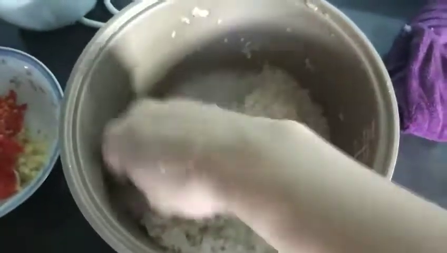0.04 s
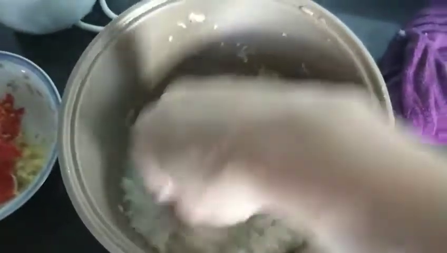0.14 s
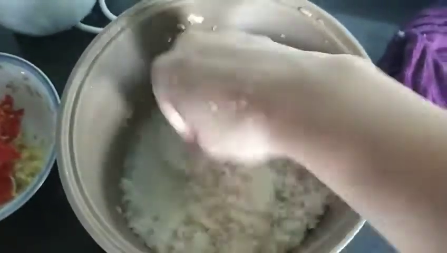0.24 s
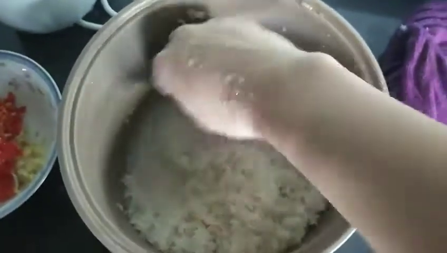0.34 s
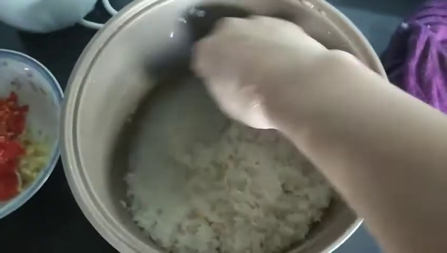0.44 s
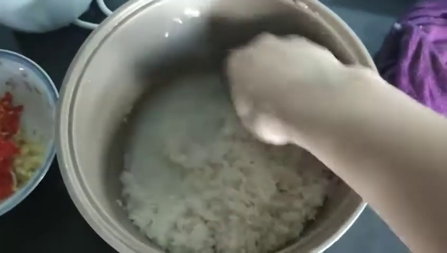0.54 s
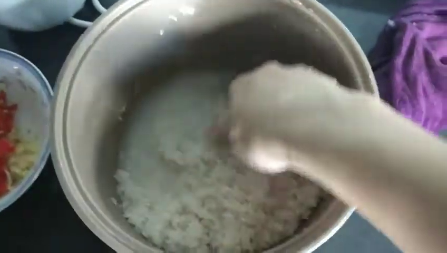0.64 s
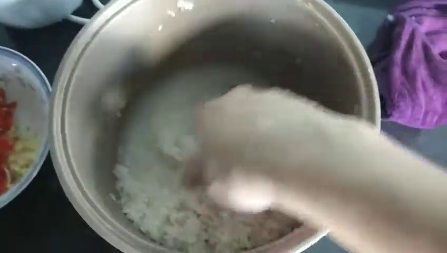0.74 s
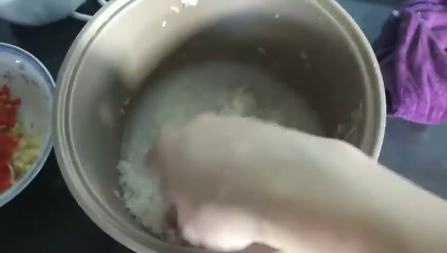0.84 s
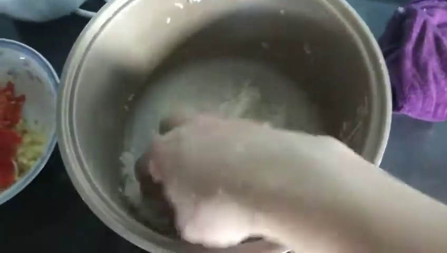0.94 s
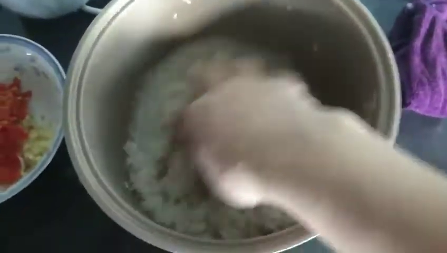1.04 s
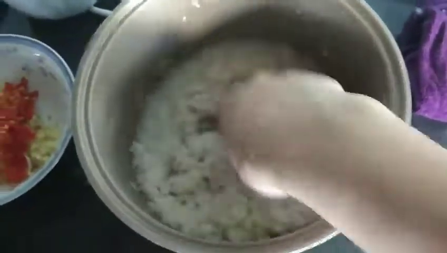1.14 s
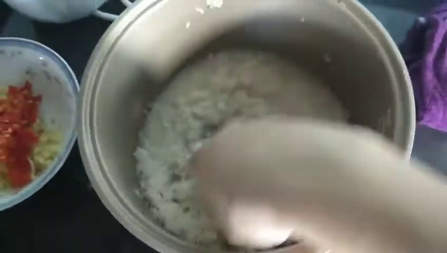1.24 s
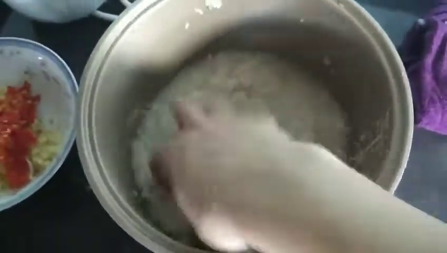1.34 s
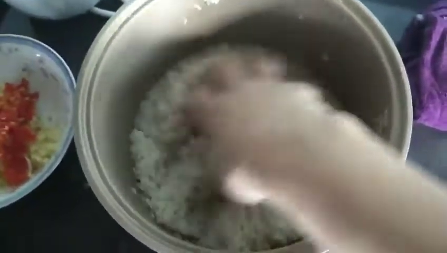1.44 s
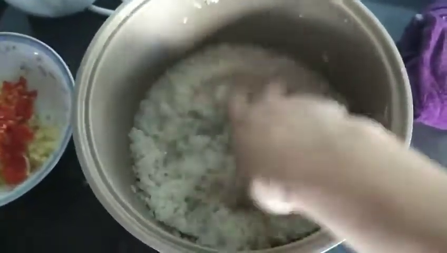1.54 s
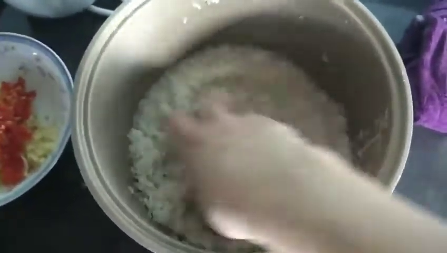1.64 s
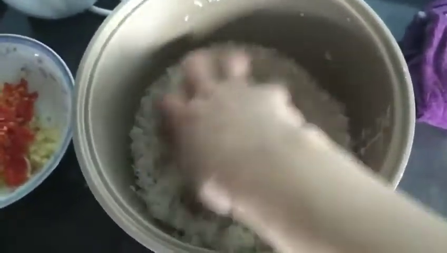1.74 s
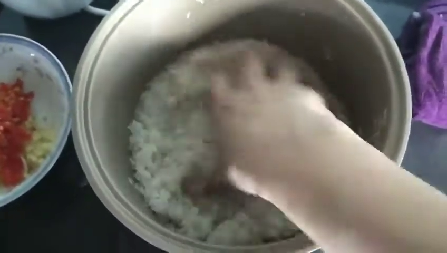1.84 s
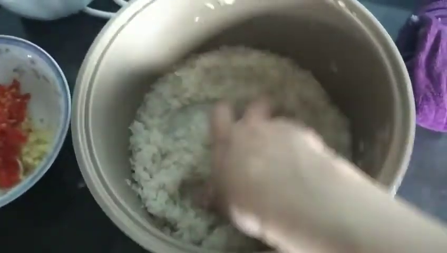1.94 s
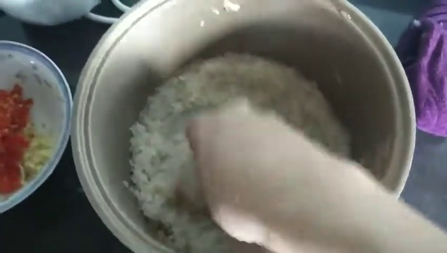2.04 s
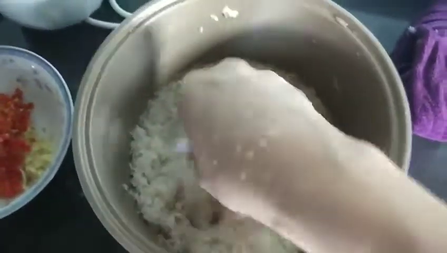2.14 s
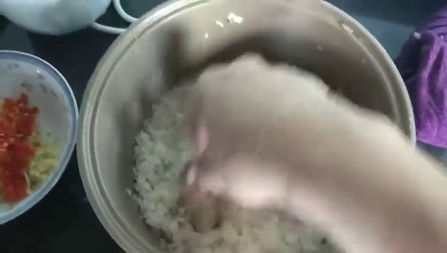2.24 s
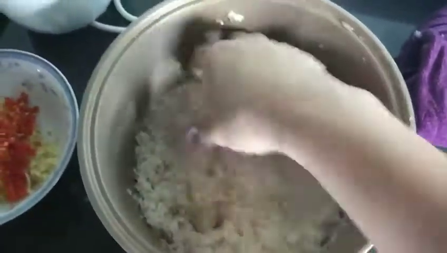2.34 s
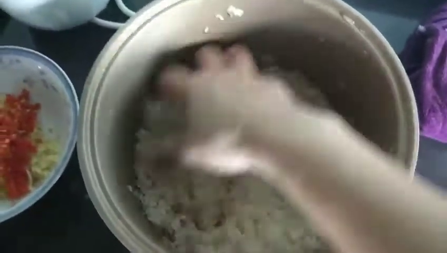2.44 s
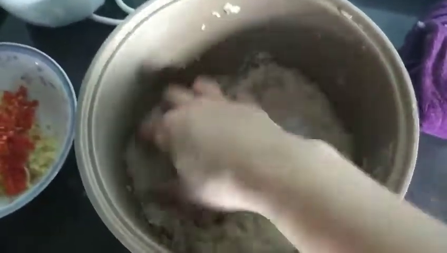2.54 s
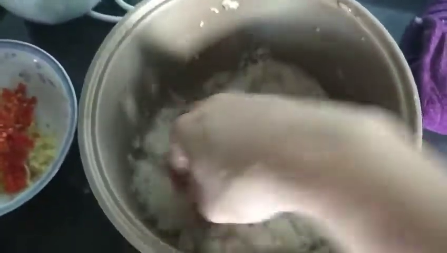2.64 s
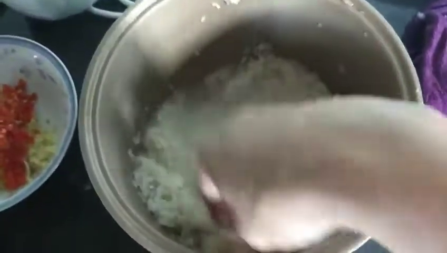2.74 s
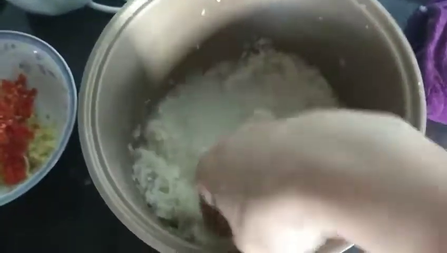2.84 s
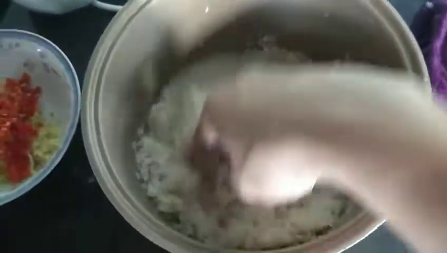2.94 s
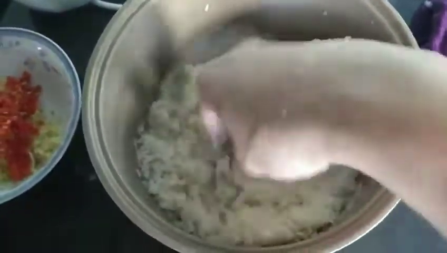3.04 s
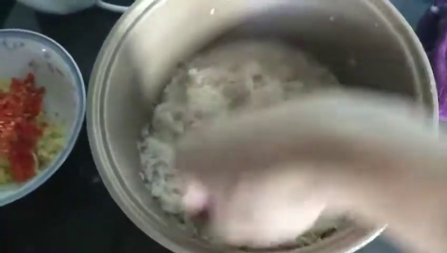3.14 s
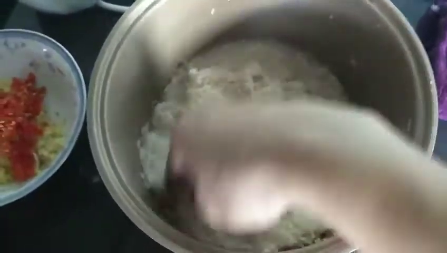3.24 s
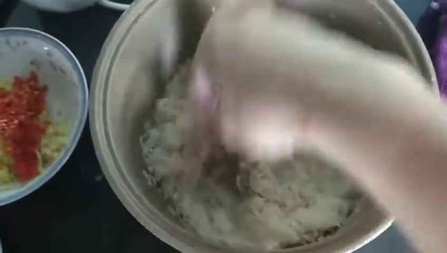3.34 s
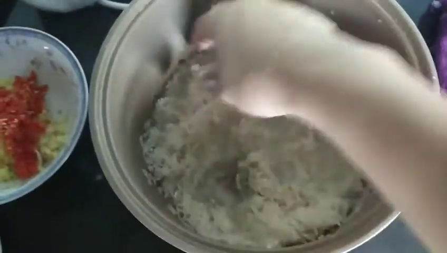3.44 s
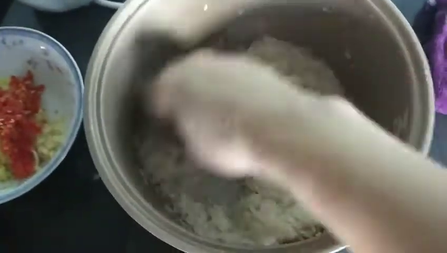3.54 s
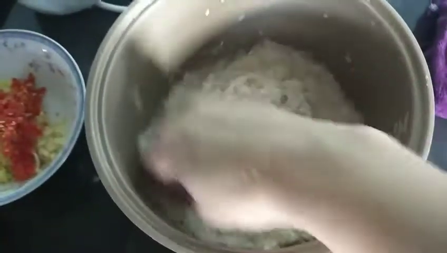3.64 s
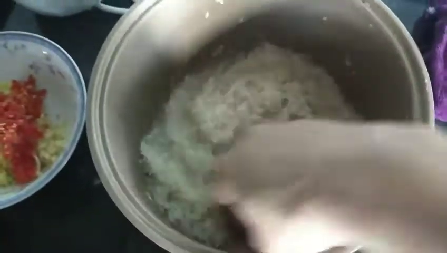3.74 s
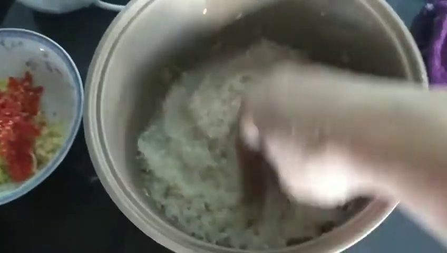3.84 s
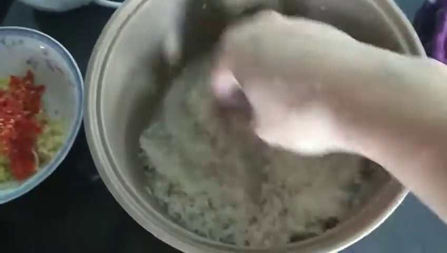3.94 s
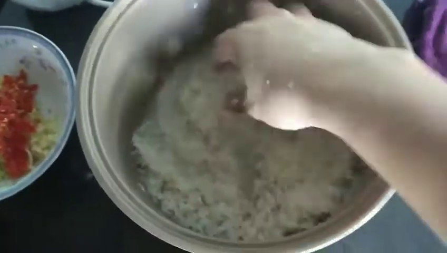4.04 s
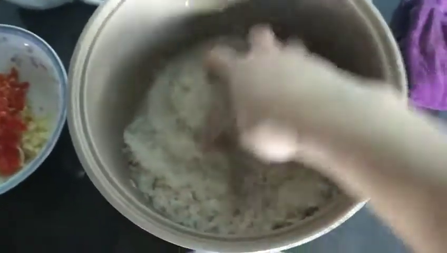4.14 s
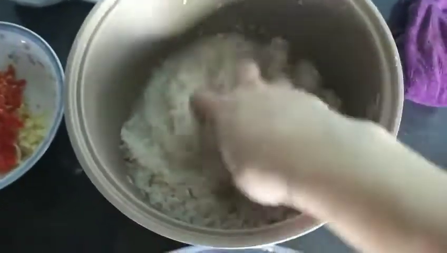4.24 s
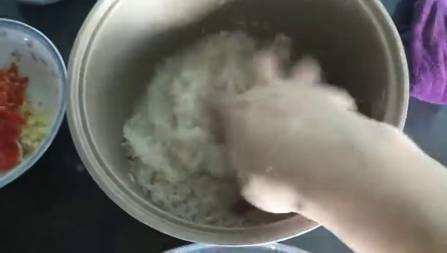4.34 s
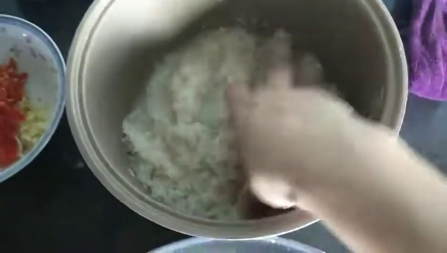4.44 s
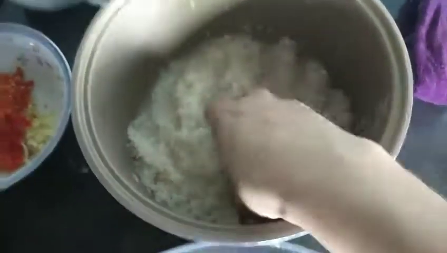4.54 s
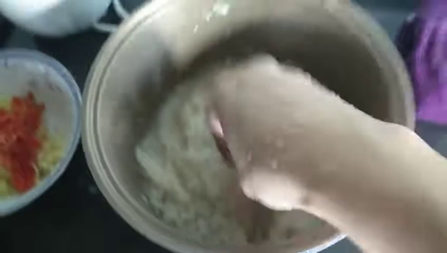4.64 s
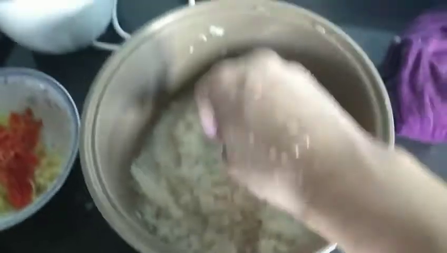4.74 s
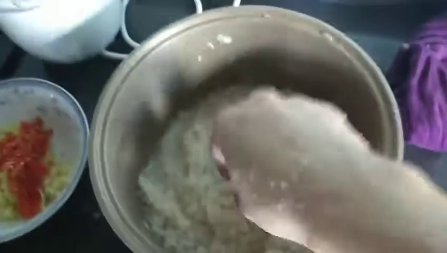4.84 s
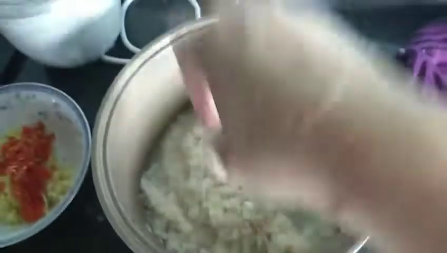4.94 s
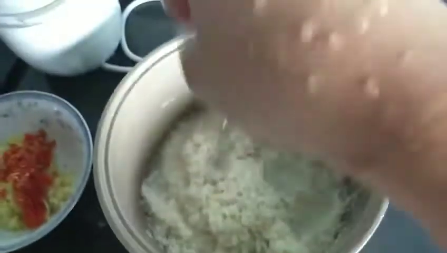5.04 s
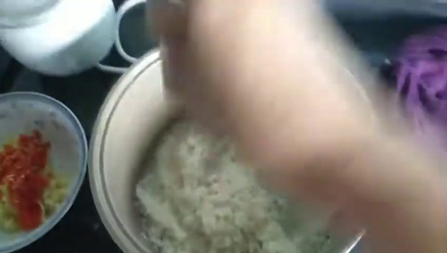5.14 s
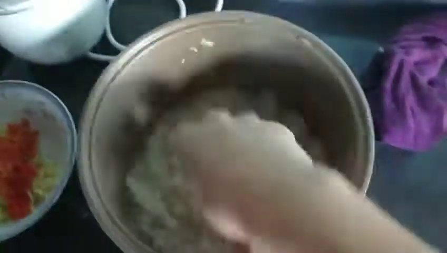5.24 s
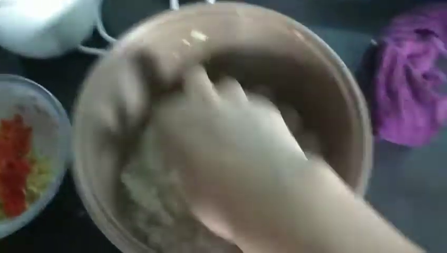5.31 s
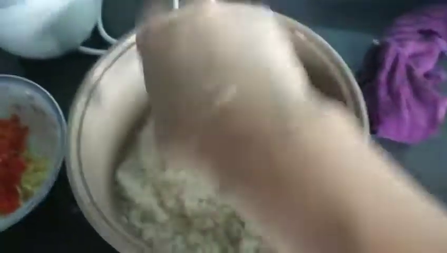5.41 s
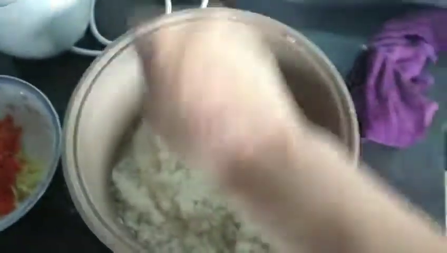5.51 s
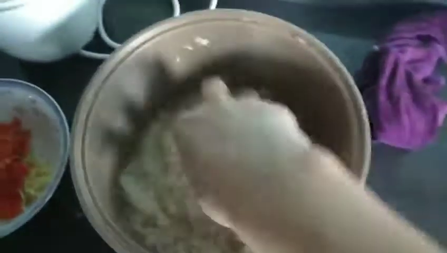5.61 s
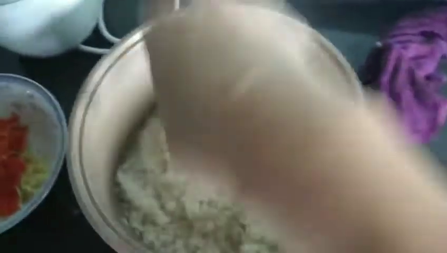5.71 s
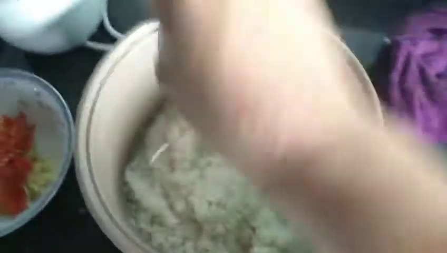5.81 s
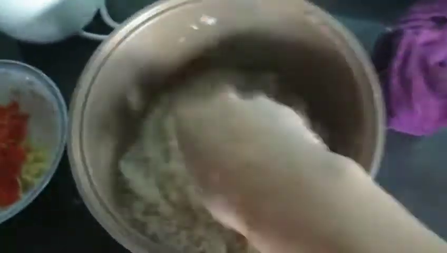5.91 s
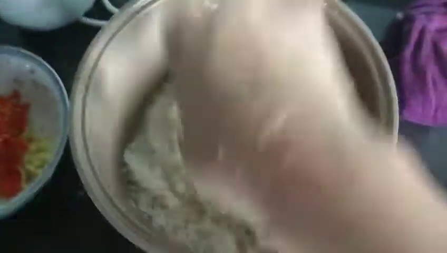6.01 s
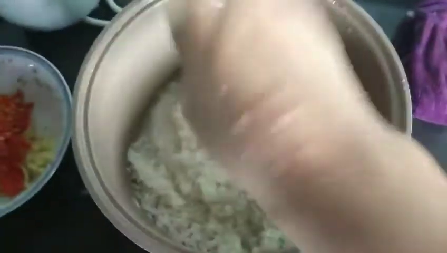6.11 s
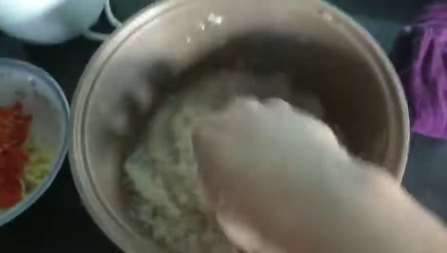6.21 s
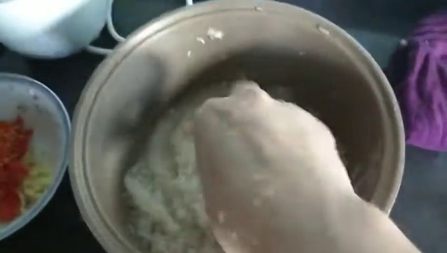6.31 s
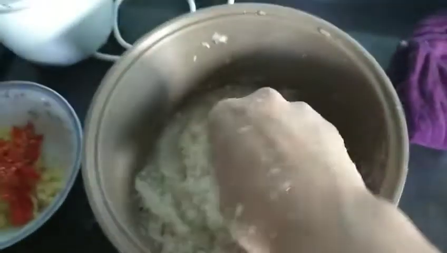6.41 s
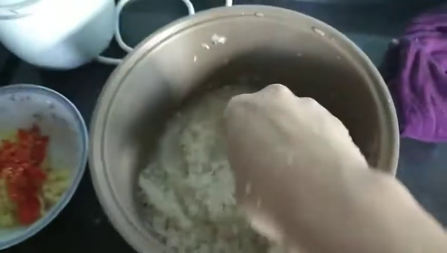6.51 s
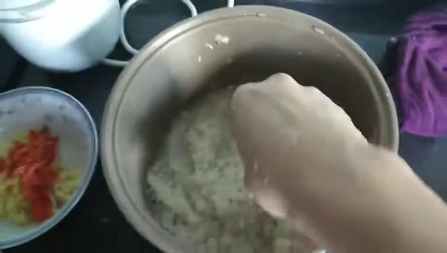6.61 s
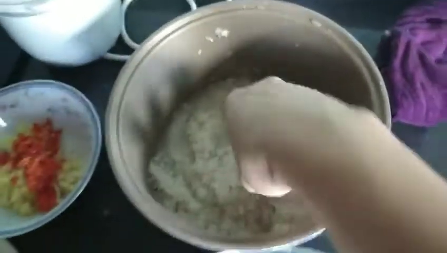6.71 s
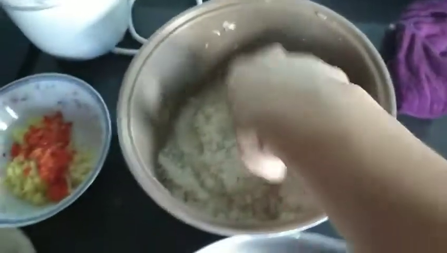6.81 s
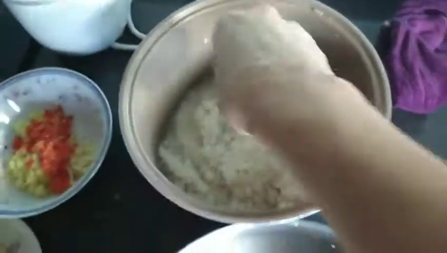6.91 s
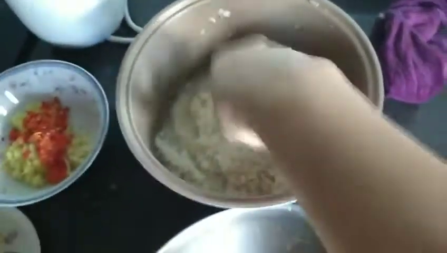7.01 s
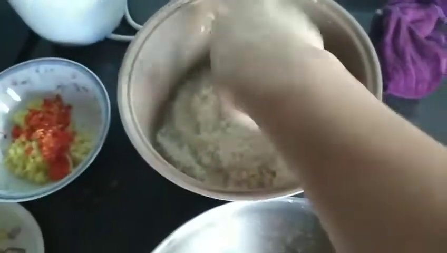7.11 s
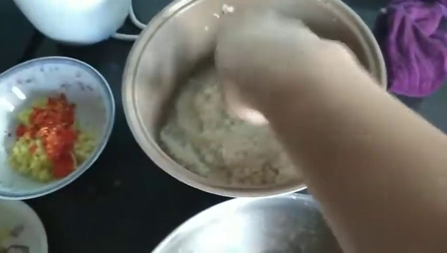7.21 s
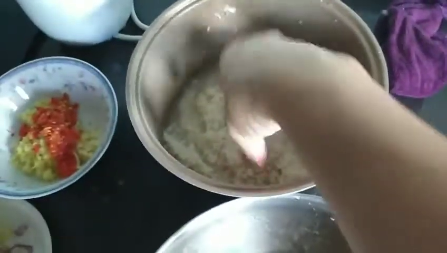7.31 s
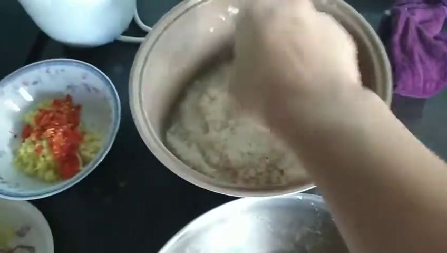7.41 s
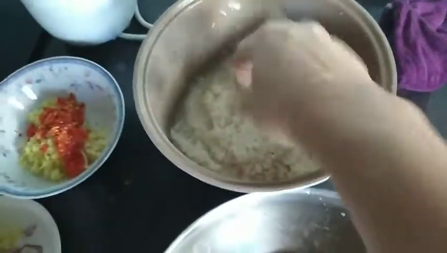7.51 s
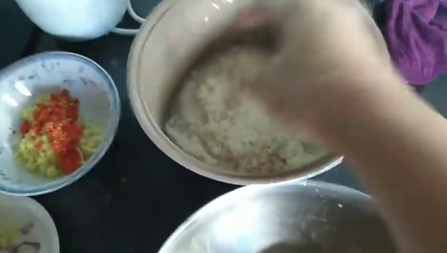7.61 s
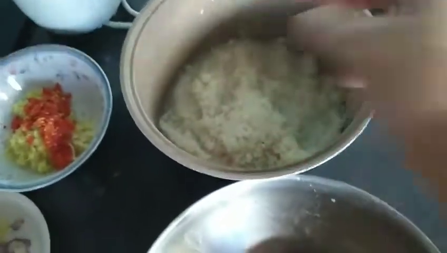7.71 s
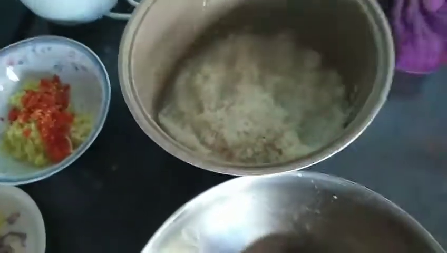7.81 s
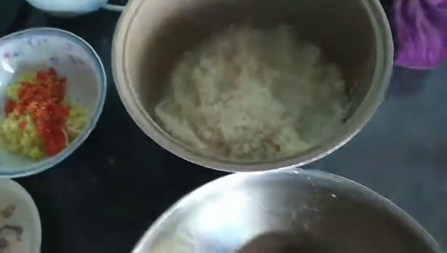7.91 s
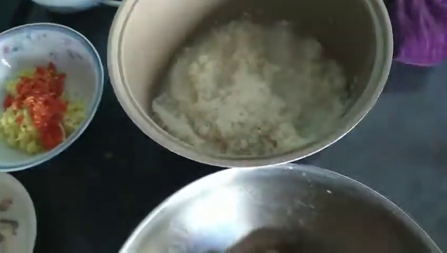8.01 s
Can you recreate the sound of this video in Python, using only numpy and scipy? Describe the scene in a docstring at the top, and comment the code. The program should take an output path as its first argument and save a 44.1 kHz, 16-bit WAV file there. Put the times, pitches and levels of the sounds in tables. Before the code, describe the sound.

Wet grains rub and crackle in irregular swishing strokes, tinted by the ringing of a metal pot. Sharp wet snaps, popping bubbles and air gulping under the palm punctuate the kneading, strongest in the first four seconds. Then come a few drops, one last moderate rub, sparse tiny ticks and near quiet. The microphone is close, in stereo, with slight kitchen reverberation.

```python
"""Wet rice rubs and crackles as a hand stirs and kneads it in a metal pot, close by, in a quiet kitchen.
Rub and crackle are dense random contacts, coloured by the pot's resonances and driven by a list of strokes.
Wet films tear with squelches, trapped air gulps out under the palm, bubbles ring, drops and films tick.
Late on, grains picked off the fingers tick at random, and one faint gliding chirp is heard.
Steady filtered noise is the room; decaying noise tails are the pot wall and the kitchen."""
import sys
import numpy as np
from scipy import signal
from scipy.fft import rfft, irfft
from scipy.io import wavfile
from scipy.ndimage import map_coordinates

SR = 44100
rng = np.random.default_rng(int(sys.argv[2]) if len(sys.argv) > 2 else 0)


def transcribe(signal):
    """Save signal, clipped to [-1, 1], as a 16-bit WAV file at the path in sys.argv[1]."""
    frames = np.atleast_2d(signal).T
    limited = np.clip(frames, -1, 1)
    pcm = np.round(limited * 32767).astype(np.int16)
    wavfile.write(sys.argv[1], SR, pcm)


N = 355446
TIME = np.arange(N) / SR
POT_T60_S = 0.09

# wet films tearing between fingers and rice: start_s, level_db, length_s
FILM_TEARS = [(0.082, -33, 0.0088), (0.351, -38, 0.023), (.497, -24.5, 0.0065), (0.565, -34.5, 0.0085),
              (0.692, -37, 0.032), (1.297, -26.5, .005), (1.675, -29, 0.023), (2.501, -27, 0.021),
              (2.595, -38, .007), (2.959, -22.5, 0.014), (3.267, -48, 0.0072), (3.304, -32.5, .01),
              (3.316, -25, 0.0096), (3.605, -16.5, 0.0075), (4.232, -21.5, 0.03), (4.586, -31, .004),
              (5.331, -33, 0.0071), (5.432, -32.5, 0.033), (5.553, -32, 0.0044), (5.737, -46, 0.0037),
              (5.794, -41, 0.014), (5.916, -46, 0.0044), (6.086, -36.5, 0.0089), (6.14, -43.5, 0.0074),
              (6.22, -53, .006), (6.404, -46.5, 0.0036), (6.889, -53, 0.014), (7.195, -51, 0.011),
              (7.439, -54, .006)]
# air pockets forced out under the palm: start_s, level_db, length_s, spray_over_gulp_db, tilt_db_per_octave
AIR_POCKETS = [(2.11, -15.5, 0.0061, 3.5, -0.8), (2.688, -23.5, 0.014, 2, -2), (3.764, -36, 0.04, 3, -1.5),
               (4.669, -34.5, .017, -22, -3)]
# resonances of the pot and the air in it: centre_hz, width_hz, lift_db
POT_RESONANCES = [(623, 61, 8), (698, 66, 4.5), (1134, 16, -1.5), (1162, 84, 9.5), (1790, 29, 8.5),
                  (1402, 59, 6.5), (1450, 31, -5.5), (2294, 37, 7), (2460, 100, 5), (2860, 25, 8),
                  (3176, 170, 3.5), (3546, 45, 1.5), (3840, 27, 5.5), (4580, 240, 6), (6590, 20, -4),
                  (7550, 98, 2.5), (7445, 100, 6.5), (8200, 50, 4.5), (8910, 53, -11.5)]
# colour of rubbing grains before the pot shapes it: freq_hz, level_db_per_hz
RUB_COLOUR = [(100, -49.5), (600, -36.5), (1200, -12.5), (1900, -1.5), (2900, 6), (4500, 7.5),
              (5200, -14.5), (8000, -37)]


def from_db(db):
    """Decibels to amplitude gain."""
    return 10 ** (np.asarray(db) / 20)


def rms_one(x):
    """Scale to unit power."""
    return x / np.sqrt(np.mean(x ** 2) + 1e-20)


def in_time(rows):
    """Each column of a curve at every sample."""
    s, *columns = np.transpose(rows)
    return [np.interp(TIME, s, c) for c in columns]


def at_hz(points, hz):
    """Read a spectrum on a log-frequency axis."""
    knots_hz, values = np.transpose(points)
    return np.interp(np.log(hz + 1), np.log(knots_hz), values)


def balance_db(hz):
    """Left and right level: half the difference goes to each channel."""
    # balance of the two channels: freq_hz, left_minus_right_db
    channel_difference = [(40, -2), (110, 16.5), (330, 12.5), (480, 3), (640, -1), (900, 1), (1200, 4.5),
                          (2500, 4), (4500, 2.5), (5500, 3), (7400, -1), (9000, 10), (11000, 9.5),
                          (14000, 5.5)]
    return at_hz(channel_difference, hz) * np.array([[.5], [-.5]])


def drift(rate_hz):
    """Random piecewise-linear curve of unit power, with rate_hz new values a second."""
    steps = rng.standard_normal(N // 20)
    return rms_one(np.interp(TIME * rate_hz, np.arange(len(steps)), steps))


def colour(x, spectrum, modes=(), size=4096):
    """Minimum-phase filter of unit power: a spectrum lifted or cut at the modes, balanced per channel."""
    hz = np.arange(size // 2 + 1) * SR / size
    db = at_hz(spectrum, hz) + balance_db(hz)
    for centre_hz, width_hz, lift_db in modes:
        db = db + lift_db / (1 + (2 * (hz - centre_hz) / width_hz) ** 2)
    # folding the cepstrum makes the filter causal
    cepstrum = irfft(np.log(from_db(db)))
    cepstrum[:, 1:size // 2] *= 2
    cepstrum[:, size // 2 + 1:] = 0
    response = rms_one(irfft(np.exp(rfft(cepstrum)))) / np.sqrt(size)
    return signal.oaconvolve(np.atleast_2d(x), response, axes=1)[:, :N]


def echoes(x, t60_s, low_hz):
    """Dense reflections: a decaying noise tail, different per channel, unit power before its low cut."""
    t = TIME[:SR // 2]
    tail = rng.standard_normal((2, len(t))) * from_db(-60 * t / t60_s) * (t > .0006)
    low_cut = signal.butter(2, low_hz, "high", fs=SR, output="sos")
    tail = signal.sosfilt(low_cut, rms_one(tail)) / np.sqrt(len(t))
    return signal.oaconvolve(x, tail, axes=1)[:, :N]


def off_walls(clicks, wet_db, t60_s):
    """Contacts bounce round the pot: noise, separate per channel, follows their decaying power."""
    keep = from_db(-60 / (t60_s * SR)) ** 2
    power = signal.lfilter([1 - keep], [1, -keep], clicks[0] ** 2 + 1e-18)
    return clicks + from_db(wet_db) * np.sqrt(power) * rng.standard_normal((2, N))


def grains(per_s, spread_db, right_lead_s=.00009, scatter_s=.00004):
    """Tiny contacts of uneven strength at random moments, each with its own lag between the channels."""
    chance = np.clip(per_s / SR, 1e-4, 1)
    strength = from_db(spread_db * np.minimum(rng.exponential(1, N), 4))
    sizes = strength * rng.choice([-1, 1], N)
    left = rms_one(sizes * (rng.random(N) < chance) / np.sqrt(chance))
    lead = np.round(SR * (right_lead_s + scatter_s * rng.standard_normal(N)))
    right_index = np.clip(np.arange(N) - lead, 0, N - 1).astype(int)
    return np.array([left, np.bincount(right_index, left, N)])


def bursts(rows, rise_s, t60_s):
    """Envelope of events (start_s, level_db, length_s) that swell, hold and die; powers add."""
    power = np.zeros(N)
    for s, db, length_s in rows:
        start = int(s * SR)
        t = TIME[:min(SR // 3, N - start)]
        decay = from_db(db - 60 * np.maximum(t - length_s, 0) / t60_s)
        power[start:start + len(t)] += (decay * (1 - np.exp(-t / rise_s))) ** 2
    return np.sqrt(power)


def clicks_at(s, db):
    """Single clicks, alike in both channels."""
    clicks = np.zeros((2, N))
    clicks[:, (s * SR).astype(int)] = from_db(db)
    return clicks


def background(alike_below_hz=900, level_db=-54.5):
    """Steady room noise, alike in both channels in the bass and diffuse above."""
    # the kitchen's background: freq_hz, level_db_per_hz
    room_colour = [(25, -21), (50, -17), (80, -2.5), (110, -2), (175, 4), (290, -6), (480, -3), (740, 0),
                   (950, -6), (2000, -8), (4600, -14.5), (5100, -22.5), (8300, -16.5), (14000, -58.5)]
    low = signal.butter(1, alike_below_hz, fs=SR, output="sos")
    high = signal.butter(1, alike_below_hz, "high", fs=SR, output="sos")
    shared = signal.sosfilt(low, rng.standard_normal(N))
    diffuse = signal.sosfilt(high, rng.standard_normal((2, N)))
    return from_db(level_db) * colour(shared + diffuse, room_colour)


def chirp(level_db=-56.5, fade_s=0.013, break_s=6.552):
    """A thin, unsteady gliding whistle that breaks at its top, perhaps a bird outside."""
    # two slurs: time_s, pitch_hz
    glide = [(6.505, 4230), (6.536, 4700), (6.552, 4850), (6.572, 4770), (6.605, 4620), (6.65, 4580)]
    hz, = in_time(glide)
    edge_s = np.min([TIME - glide[0][0], glide[-1][0] - TIME, abs(TIME - break_s)], axis=0)
    fade = np.clip(edge_s / fade_s, 0, 1) ** 2
    phase = 2 * np.pi * np.cumsum(hz + 40 * drift(250)) / SR
    return from_db(level_db + 2.9 * drift(120)) * fade * np.sin(phase)


def bubbles(rise_per_s=1.0):
    """Small bubbles and drips: decaying sines that rise a little in pitch."""
    # start_s, pitch_hz, level_db, t60_s
    bubble_rings = [(2.522, 332, -44, .09), (3.262, 1570, -38, .035), (3.607, 340, -46, 0.085),
                    (3.608, 5640, -15, 0.033), (4.092, 7200, -24, 0.027), (4.244, 348, -50.5, 0.19),
                    (5.104, 1640, -44.5, 0.076), (7.325, 1870, -47.5, 0.056), (7.328, 2200, -51, 0.058)]
    out = np.zeros((2, N))
    t = TIME[:SR // 5]
    for s, hz, db, t60_s in bubble_rings:
        start = int(s * SR)
        tone = np.sin(2 * np.pi * hz * t * (1 + rise_per_s * t / 2))
        ring = tone * from_db(db - 60 * t / t60_s) * (1 - np.exp(-t / 0.00092))
        out[:, start:start + len(t)] += ring * from_db(balance_db(hz))
    return out


def hollow(rise_s=0.0067):
    """Every gulp leaves the pot and the air in it ringing in a few decaying modes."""
    # freq_hz, level_against_gulp_db, t60_s
    hollow_modes = [(180.3, -27.5, 0.39), (582.5, -8.5, 0.29), (638, -11, 0.19), (777, -13.5, 0.18)]
    out, t = np.zeros((2, N)), TIME[:SR // 2]
    for s, db, *_ in AIR_POCKETS:
        start = int(s * SR)
        for hz, mode_db, t60_s in hollow_modes:
            decay = from_db(db + mode_db - 60 * t / t60_s)
            ring = np.sin(2 * np.pi * hz * t) * decay * (1 - np.exp(-t / rise_s))
            out[:, start:start + len(t)] += ring * from_db(balance_db(hz))
    return out


def gulps():
    """Escaping air sputters, water slaps back into the pocket, and a fine spray follows each a moment later."""
    # colours before the pot shapes them: freq_hz, level_db_per_hz
    gulp_colour = [(30, -37), (90, -39), (175, -18), (260, -19), (370, -8), (480, -12), (610, -6),
                   (830, -7), (1120, 2.5), (1600, 0.5), (2400, 5.5), (3600, 3.5), (4500, -5.5), (5200, -28),
                   (9000, -41.5)]
    spray_colour = [(300, -37), (4000, -26.5), (5300, -32), (6400, -14), (7500, -9.5), (8800, -13),
                    (10000, -31.5), (14000, -39)]
    refill_delay_s, refill_db, refill_s = 0.019, -8, .016
    spray_delay_s = 0.0033
    sputter = grains(8000, spread_db=1.0, right_lead_s=-.00008)
    droplets = grains(12000, spread_db=.5)
    out, spray = 0, []
    for s, db, length_s, spray_db, tilt_db in AIR_POCKETS:
        surges = [(s, db, length_s), (s + refill_delay_s, db + refill_db, refill_s)]
        envelope = bursts(surges, rise_s=0.00091, t60_s=0.018)
        air = off_walls(envelope * sputter, wet_db=-2, t60_s=0.22)
        tilted = [(hz, level + tilt_db * np.log2(hz / 1800)) for hz, level in gulp_colour]
        out = out + colour(air, tilted, POT_RESONANCES)
        spray += [(start + spray_delay_s, level + spray_db, hold) for start, level, hold in surges]
    mist = bursts(spray, rise_s=0.0013, t60_s=.025) * droplets
    return out + colour(off_walls(mist, wet_db=-4, t60_s=0.11), spray_colour, POT_RESONANCES)


def ticks():
    """Tearing films fling drops at the wall, falling drops splash and knock on the rice, picked grains tick."""
    # drops falling from the hand onto the rice: start_s, level_db
    falling_drops = [(.355, -18), (4.59, -8.5), (5.258, -21), (5.741, -14), (7.4403, -32)]
    # colour before the pot shapes it: freq_hz, level_db_per_hz
    tick_colour = [(100, -48), (1200, -24.5), (2900, 1.5), (5000, -0.5), (6500, -0.5), (8800, 12),
                   (11000, 3.5), (14200, 3)]
    flick_db, flick_db_per_tear_db, flick_delay_s = -2, 0.61, 0.0012
    flick_loss_db_per_s = 201.5  # slow tears flick less
    thud_db = -7.5  # the grains' knock against the splash
    pick_from_s, pick_to_s, picks_per_s = 5.5, 7.3, 6
    pick_db, pick_spread_db = -36, 4.5

    s, db, length_s = np.transpose(FILM_TEARS)
    flick_levels_db = flick_db + flick_db_per_tear_db * db - flick_loss_db_per_s * length_s
    flicks = clicks_at(s + flick_delay_s, flick_levels_db)
    drops = clicks_at(*np.transpose(falling_drops))
    picking = (TIME > pick_from_s) * (TIME < pick_to_s)
    picked = (rng.random(N) < picks_per_s / SR) * picking
    picks = picked * from_db(pick_db + pick_spread_db * rng.uniform(-1, 1, N))
    knocks = off_walls(from_db(thud_db) * drops, wet_db=2, t60_s=0.026)
    thuds = colour(knocks, RUB_COLOUR, POT_RESONANCES)
    sharp = off_walls(flicks + drops + picks, wet_db=5, t60_s=0.023)
    return thuds + colour(sharp, tick_colour, POT_RESONANCES)


def squelches():
    """A wet film tears in a quick, bright run of bursting micro-bubbles."""
    # colour before the pot shapes it: freq_hz, level_db_per_hz
    squelch_colour = [(50, -55.5), (300, -21), (1200, -25.5), (2500, -16.5), (4400, -8), (5100, -13),
                      (5800, -2), (7500, 0.5), (8800, 8), (10200, -1.5), (14200, -7.5)]
    tearing = bursts(FILM_TEARS, rise_s=0.00046, t60_s=0.02) * grains(9000, spread_db=-1.0)
    return colour(off_walls(tearing, wet_db=-1.5, t60_s=POT_T60_S), squelch_colour, POT_RESONANCES)


def strokes():
    """Crackle, rub and press levels in dB: each stroke swells and eases off; overlapping powers add."""
    # strokes of the hand: fastest_s, swell_s, ease_s, effort_db, wetness_db, bottom_pressure_db
    hand_strokes = [(.14, 0.084, 0.057, -44.5, 11.5, -21), (.24, 0.14, 0.12, -41.5, 3, -23),
                    (0.601, .055, 0.27, -43.5, 5, -7.5), (.88, 0.093, 0.17, -41, 2, -12.5),
                    (1.03, 0.065, 0.61, -37.5, -1, -8.5), (1.37, 0.2, 0.15, -37, 9, -33),
                    (1.48, 0.072, .2, -37, 4.5, -4), (1.64, 0.071, 0.17, -35, 4, -20),
                    (1.79, 0.025, 0.22, -34, 3.5, -9.5), (2.08, 0.16, 0.26, -36.5, 3, -16.5),
                    (2.18, 0.061, 0.069, -35.5, 0.5, -3), (2.409, 0.079, 0.29, -45, 9.5, -9),
                    (2.738, 0.33, 0.12, -42.5, 2.5, -9.5), (3.048, 0.11, 0.1, -34.5, 2.5, -5),
                    (3.372, 0.037, 0.064, -30, 4.5, -14), (3.62, 0.0098, 0.34, -43, 9, -17),
                    (3.92, 0.19, 0.11, -35.5, 5.5, -14), (4.03, 0.046, 0.11, -40.5, 6, -12),
                    (4.36, .14, 0.15, -39, 5, -12), (4.645, 0.098, 0.11, -42, 9, -9.5),
                    (4.86, 0.22, 0.2, -51, 6.5, -13.5), (5.05, 0.061, 0.052, -57, 9, 0),
                    (5.445, 0.039, 0.082, -42.5, 4, -15), (5.83, .11, 0.07, -55.5, 4.5, 0.5),
                    (6.1, .05, 0.12, -56, 1.5, -4), (6.89, .02, 0.14, -70, 7.5, 9),
                    (7.21, 0.19, .14, -61, -6.5, 2.5), (7.46, 0.22, 0.13, -63, -3, 5.5),
                    (7.94, 0.15, .077, -59, 1, 1)]
    drop_db, curve = 10.0, 1.154  # drop one swell before or one ease after the peak; curve 1 = pointed
    settling_crackle_db, settling_rub_db = -77, -70  # the rice left to itself
    rub_lag_s = 0.0019  # the wet surface crackles just before the grains beneath rub
    crackle, rub, press = from_db(settling_crackle_db) ** 2, from_db(settling_rub_db) ** 2, 1e-12
    t = TIME[::40]
    for s, swell_s, ease_s, effort_db, wet_db, press_db in hand_strokes:
        away = np.maximum((s - t) / max(swell_s, 1e-3), (t - s) / max(ease_s, 1e-3))
        db = effort_db - drop_db * away ** curve
        crackle = crackle + from_db(db + wet_db) ** 2
        rub = rub + from_db(db) ** 2
        press = press + from_db(db + press_db) ** 2
    lagged = [(crackle, 0), (rub, rub_lag_s), (press, rub_lag_s)]
    return [np.interp(TIME - lag_s, t, 10 * np.log10(power)) for power, lag_s in lagged]


def fizz(level_db, per_s=130, t60_s=0.066, count=18):
    """Micro-bubbles pop among the grains, each exciting one of a bank of resonators."""
    pops = from_db(level_db) * grains(per_s, spread_db=2.0)
    dealt = rng.integers(0, count, N // 32 + 1).repeat(32)[:N]  # resonator in use, per 32 samples
    r, out = from_db(-60 / (t60_s * SR)), 0
    for k, hz in enumerate(np.linspace(5500, 11500, count)):
        w = 2 * np.pi * hz / SR
        gain = np.sin(w) * np.sqrt(2 * (1 - r * r))
        out = out + signal.lfilter([gain], [1, -2 * r * np.cos(w), r * r], pops * (dealt == k) + 1e-18)
    return out


def past_hand(x, depth_db, rate_hz, width_hz):
    """The moving hand shades and reflects: each part of the spectrum swells and fades on its own."""
    hz, s, frames = signal.stft(x, SR, nperseg=256)
    field = rng.standard_normal((64, 1024))
    place = np.meshgrid(hz / width_hz, s * rate_hz, indexing="ij")
    shade = map_coordinates(field, place, order=1, mode="wrap")
    return signal.istft(frames * from_db(depth_db * shade), SR)[1][:, :N]


def stirring():
    """The faster the hand, the more grains slip each second; they let go in clumps, and a few snap free alone."""
    # colours before the pot shapes them: freq_hz, level_db_per_hz
    crackle_colour = [(100, -64.5), (1500, -41.5), (4000, -10), (5200, -9), (6500, -4.5), (7800, -4),
                      (8900, -0.5), (10200, -8), (12000, -12.5), (14200, -16)]
    press_colour = [(100, -34), (400, -11), (520, -6), (650, -2), (850, -5.5), (1150, -6), (1500, -4),
                    (2200, -1.5), (4000, -16)]
    snaps_per_s, snaps_db = 110, -12  # level against the crackle
    crackle_db, rub_db, press_db = strokes()
    clumps = drift(70)
    speed = from_db(.7 * (crackle_db + 34.5))

    crackle_gain = from_db(crackle_db - 0.35 + 0.81 * clumps + 1.6 * drift(260))
    crackle = crackle_gain * grains(3400 * speed + 300, spread_db=1.5)
    snaps = from_db(crackle_db + snaps_db) * grains(snaps_per_s, spread_db=0.2)
    crackle = crackle + fizz(crackle_db - 10.0) + snaps
    rub_gain = from_db(rub_db - .3 + 0.51 * clumps + 0.53 * drift(25) + 1.5 * drift(200))
    rub = rub_gain * grains(3000 * speed + 700, spread_db=2.0)
    press = from_db(press_db - 1.1 + 2.9 * drift(30)) * grains(2000, spread_db=3.5)

    swish = 0
    for clicks, spectrum in [(crackle, crackle_colour), (rub, RUB_COLOUR), (press, press_colour)]:
        in_pot = off_walls(clicks, wet_db=-2.5, t60_s=POT_T60_S)
        swish = swish + colour(in_pot, spectrum, POT_RESONANCES)
    return from_db([[-.6], [-1.4]]) * past_hand(swish, depth_db=2.5, rate_hz=22, width_hz=678)


def scene():
    """Rice sound comes straight out of the pot, with the wall's dense ringing and a little of the kitchen."""
    rice = stirring() + squelches() + ticks() + gulps() + hollow() + bubbles()
    wall = from_db(-12) * echoes(rice, t60_s=.06, low_hz=2000)
    close = from_db(-1.15) * rice + wall + chirp()
    kitchen = from_db(-16) * echoes(close, t60_s=0.64, low_hz=200)
    return close + kitchen + background()


def record(dry, top=0.91, cutoff_hz=14300):
    """The loudest peaks are rounded and the treble is cut steeply."""
    rounded = top * np.tanh(dry / top)
    return signal.sosfilt(signal.ellip(12, .2, 80, cutoff_hz, fs=SR, output="sos"), rounded)


dry = scene()
out = record(dry)
transcribe(out)
```